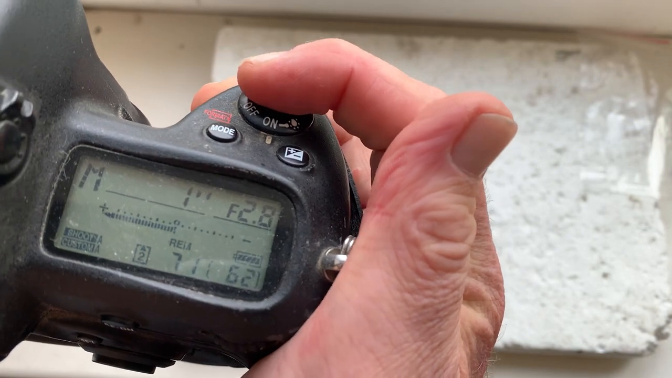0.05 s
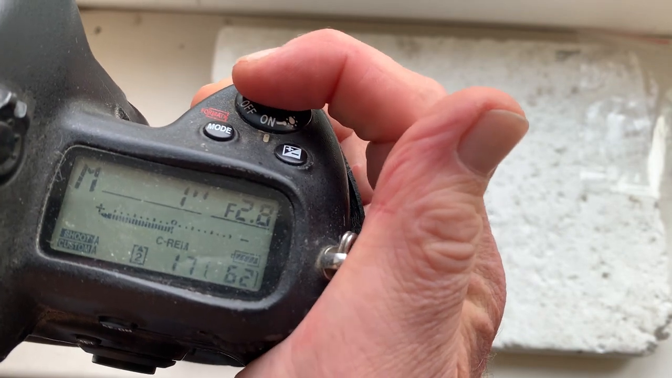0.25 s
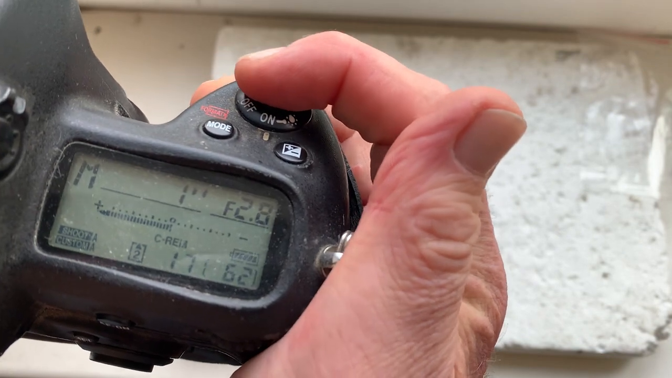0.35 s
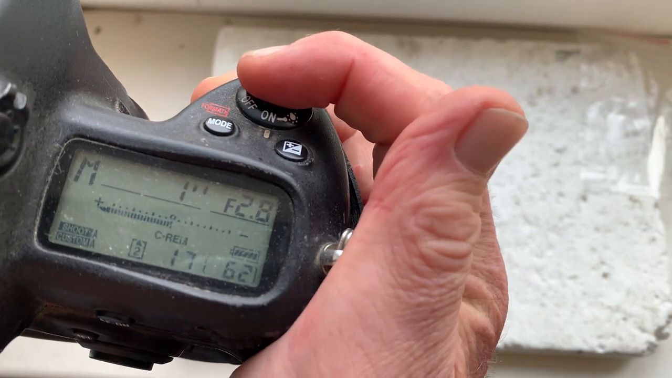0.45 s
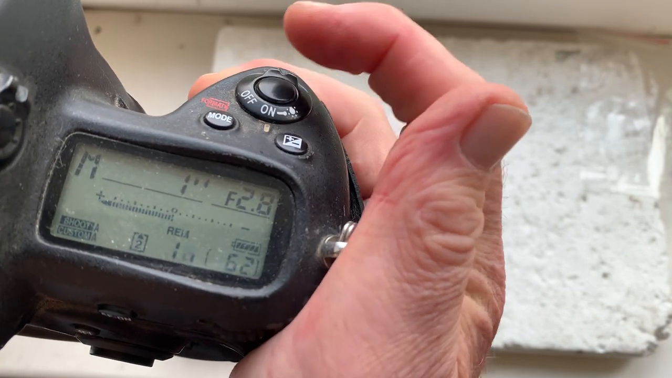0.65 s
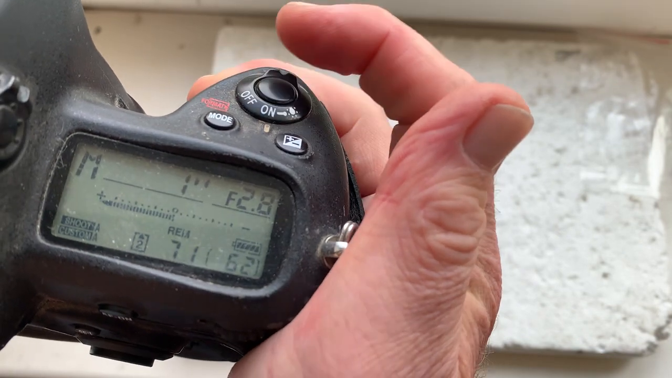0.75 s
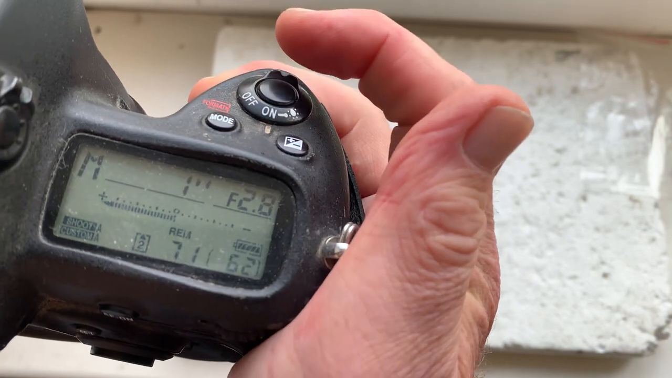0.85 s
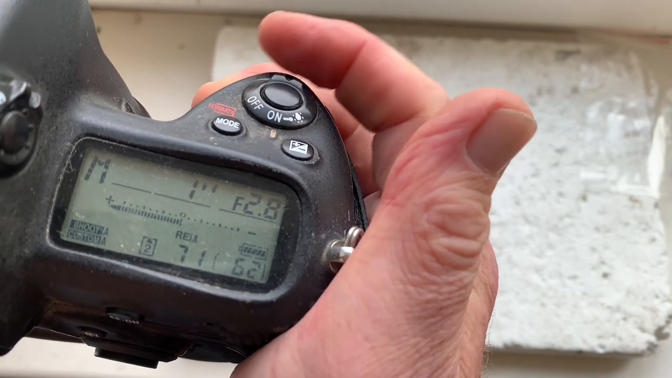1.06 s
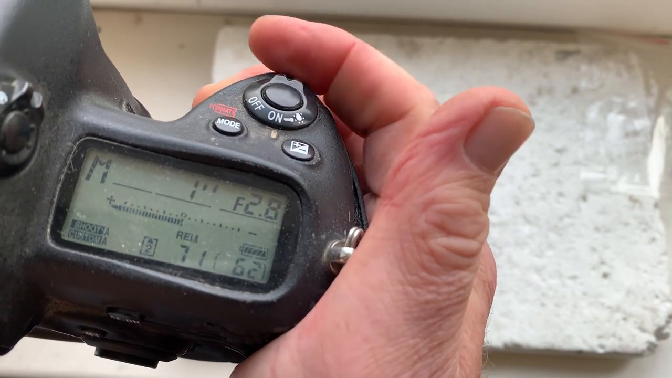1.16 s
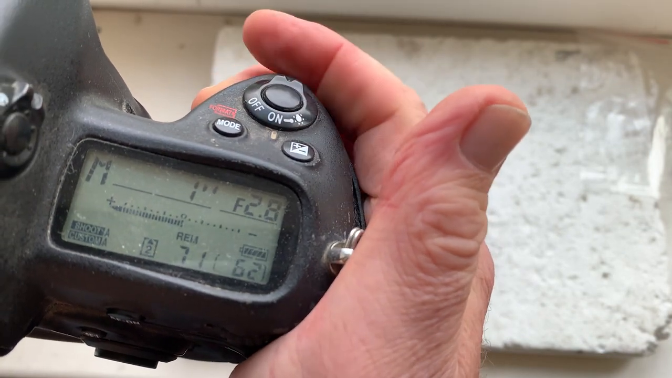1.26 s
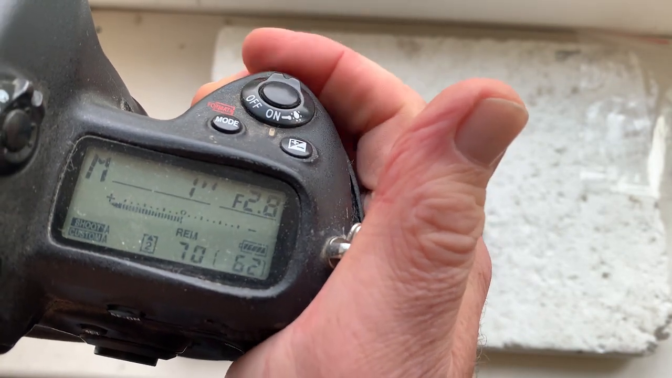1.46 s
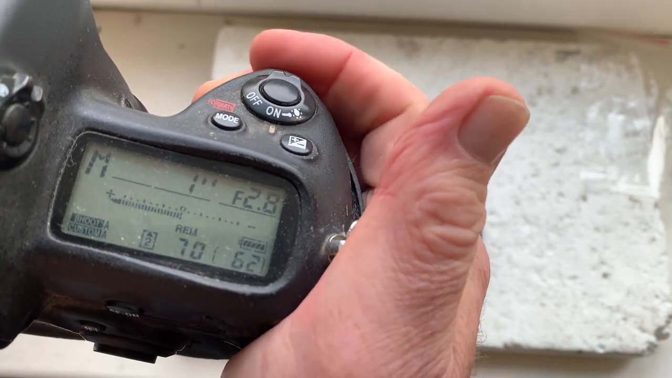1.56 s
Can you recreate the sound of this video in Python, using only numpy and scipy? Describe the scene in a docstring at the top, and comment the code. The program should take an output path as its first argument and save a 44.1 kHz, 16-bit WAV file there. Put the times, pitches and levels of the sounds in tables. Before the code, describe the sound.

A reflex camera shutter, close up in a small, quiet room. At 0.24 s the mirror slaps up sharply, followed by the curtain click at 0.28 s. A faint button-release tick comes near 0.58 s. At 1.27 s the second curtain snaps shut and the mirror drops, rattling in a rapid cluster until about 1.33 s. Short bright room tail; barely audible grip ticks, wavering low hum and rumble.

```python
"""A reflex camera's mechanism takes a one-second exposure, close to two microphone ports in a small room.
The mirror slaps up and the first curtain runs; the finger lets the button go; then the second curtain
closes and the mirror drops and rattles to rest. Each contact is a coloured noise burst plus body modes;
a decaying-noise room answers. Beneath lie a wavering sine hum, filtered-noise rumble and hiss, and
a very faint gliding whistle near the close."""
import sys
import numpy as np
from scipy import signal
from scipy.fft import rfft, irfft, next_fast_len
from scipy.io import wavfile
from scipy.ndimage import map_coordinates

SR = 44100
rng = np.random.default_rng(int(sys.argv[2]) if len(sys.argv) > 2 else 0)


def materialize(psi):
    """Save the field psi as 16-bit PCM at rate SR to the path in sys.argv[1].

    A 1-D psi becomes a single channel; in a 2-D psi each row is a channel.
    """
    bounded = np.clip(np.atleast_2d(psi).T, -1, 1)
    quanta = np.round(bounded * 32767).astype(np.int16)
    wavfile.write(sys.argv[1], SR, quanta)


N = 70560  # samples, 1.6 s

# Contacts of the mechanism. Each row: start in seconds, part name, level in dB,
# brightness in dB per octave above 500 Hz, nominal t60 in seconds.
CONTACTS = [ (.2351, "mirror up", -8, .5, .011), (.2367, "mirror up", -9, 0, .016),
            (.2400, "mirror up", -26.5, -1, 0.15), (0.2498, "mirror up", -26, 3.5, 0.013),
            (0.2487, "mirror up", -26, 4, .018), (.2560, "mirror up", -32, 1, 0.017),
            (.2640, "first curtain", -38, -7, 0.048), (0.2713, "first curtain", -29, -2.5, 0.05),
            (.2757, "first curtain", -15, 0, .02), (.2775, "first curtain", -17, 1, .025),
            (1.2694, "second curtain", -26.5, 2, 0.068), (1.271, "second curtain", -23, 1, 0.055),
            (1.2755, "second curtain", -10.5, .5, .021), (1.2818, "second curtain", -24, 1.5, 0.082),
            (1.2885, "mirror down", -28.5, -2.5, 0.047), (1.2932, "mirror down", -11, .3, .016),
            (1.2973, "mirror down", -14, -1.5, 0.02), (1.3004, "mirror down", -18.5, 3, .026),
            (1.3023, "mirror down", -21.5, -0.5, 0.025), (1.307, "mirror down", -24, -2, 0.07),
            (1.3102, "mirror down", -20.5, -1.3, .018), (1.3144, "mirror down", -20, -1.5, 0.011),
            (1.3179, "mirror down", -12, 1, .018), (1.3224, "mirror down", -26.5, -2, 0.042),
            (1.3263, "mirror down", -34, -2, .03), (0.0381, "grip", -62, 1, .015),
            (0.1347, "grip", -65.5, -1.5, 0.021), (0.555, "button", -64, 16.5, 0.071),
            (0.568, "grip", -56.5, 3.5, .025), (.5768, "button", -40, -2, 0.018),
            (0.5782, "grip", -58, 0.5, .04), (1.4853, "grip", -69.5, 2, 0.018)]
# Moving parts by name. Each entry: relative colour as rows of Hz and dB, body ring in dB, room send in dB.
PARTS = {"mirror up": ([(120, -33.5), (195, -32), (1140, -9.5), (1350, -5), (1800, -18), (2140, -9),
         (2660, -10.5), (3560, -3), (6650, -16), (9130, -3.5), (9570, -17), (10600, 3), (11900, -10.5),
         (13300, -5), (14100, -18.5), (14600, -18), (15600, -25)], -8, 0), "first curtain": ([(120, -44),
         (209, -47), (329, -33), (835, -31), (1020, -7), (1450, -1.5), (1700, -13), (2270, -22),
         (4160, -5.5), (7380, -12.5), (8570, -3), (10500, -2.5), (11600, -7), (13200, -6.5), (14600, -18.5),
         (15600, -17.5)], -2, 2.4), "second curtain": ([(120, -32), (167, -42), (391, -3.5), (588, -16.5),
         (1350, 9.5), (2390, -12), (3240, 2), (5630, -4), (7640, 3), (8710, -7.5), (8990, -2.5),
         (11800, -7.5), (12600, 4.5), (13700, -15.5), (14400, -30), (15600, -19)], 0, 0),
         "mirror down": ([(120, -25.5), (240, -26.5), (349, -19.5), (509, -30.5), (802, -9), (1400, -5),
         (2460, -15.5), (3400, -7.5), (7380, -11), (8160, 1.5), (11000, -3), (11400, -13), (12300, -0.5),
         (13200, -5), (14300, -16), (15600, -22.5)], -3.4, -1.4), "button": ([(500, -32), (1440, -43),
         (4630, -15), (5510, -10.5), (7330, -11), (8830, 4.5), (10400, -4), (12500, -8), (15600, -44)],
         -35, 2), "grip": ([(300, -16), (1600, -6.5), (2500, -11), (2850, 3.5), (3250, -13.5), (4200, -7),
         (5500, -16), (11000, -11.5), (15000, -30)], -14, -2)}
# Springs and frame, rung by every contact. Each row: frequency in Hz, level in dB, t60 in seconds.
BODY_MODES = [(381.6, -20.5, 0.057), (453.3, -24.5, 0.04), (882, -23, 0.035), (1427, -31.5, .13),
              (1687, -23, 0.091), (1878, -23.5, .1), (3755, -26, .06), (3990, -25.5, .08),
              (4380, -23.5, 0.049), (6281, -22.5, .08), (7020, -25, 0.064), (9780, -26.5, 0.075),
              (10700, -25, .08), (12020, -27.5, 0.061)]
# Phase lead of the left port over the right. Each row: frequency in Hz, lead in radians.
LEFT_LEAD = [(380, 0.5), (560, 0.2), (1000, 2), (1400, 4), (2200, 4), (3000, 8), (3700, 7), (4400, 10.5),
             (5300, 7.5), (6400, 7), (8600, 2.5), (10900, 0.5), (13300, -3.5), (15700, -8.5)]
# Left-right likeness of the direct sound. Each row: frequency in Hz, correlation from 0 to 1.
DIRECT_LIKENESS = [(300, 0.94), (1400, .85), (2500, 0.41), (5500, 0.36), (8000, .95), (13000, 0.97),
                   (15000, 1)]
# Left-right likeness of room and background. Each row: frequency in Hz, correlation from 0 to 1.
ROOM_LIKENESS = [(100, 1), (400, 0.85), (1000, 0.3), (6000, 0.21), (8500, 1), (13000, 1)]
# Decay of the room. Each row: frequency in Hz, t60 in seconds.
ROOM_T60 = [(300, 0.12), (1400, 0.29), (5000, 0.2), (10000, 0.18), (15000, 0.069)]
# Colour of the room. Each row: frequency in Hz, gain in dB.
ROOM_COLOUR = [(200, 2.5), (600, 0.5), (1400, -5.5), (3000, -1.5), (6500, -2), (10000, -5), (15000, -2.5)]
# Faint whistle. Each row: time in seconds, frequency in Hz, peak level in dB.
WHISTLE = [(1.059, 6200, -105), (1.10, 6330, -83), (1.14, 6770, -89), (1.17, 7130, -81.5),
           (1.22, 7200, -90), (1.269, 7000, -64), (1.29, 7000, -120)]
# Shared level of hum and rumble, before their offsets. Each row: time in seconds, level in dB.
HUM_LEVEL = [(0.0, -58), (0.022, -59), (0.084, -62), (0.628, -74), (0.69, -61), (0.716, -66.5), (0.77, -60),
             (0.912, -65), (0.948, -61), (1.122, -64.5), (1.148, -57.5), (1.304, -60.5), (1.336, -70),
             (1.478, -79), (1.514, -76), (1.6, -72.5)]
# Relative colour of the rumble. Each row: frequency in Hz, level in dB.
RUMBLE_COLOUR = [(20, -9.5), (42, 2.5), (58, -1), (76, -0.5), (120, -5.5), (180, -10.5), (280, -29),
                 (390, -19.5), (560, -30), (900, -37), (2000, -51.5)]
# Relative colour of the hiss. Each row: frequency in Hz, level in dB.
HISS_COLOUR = [(100, -2.5), (260, 6), (390, 15), (560, 4), (800, 2.5), (1500, 4.5), (2300, -0.5),
               (7300, -5), (8600, -10.5), (11300, 0), (13000, -4), (14400, -16.5), (16000, -29)]

ATTACK_S, RING_WIDTH_HZ = 0.00046, 17
ROOM_DB, ROOM_BUILD_S = -18, 0.0038
WHISTLE_WIDTH_HZ = 60
HUM_HZ, HUM_DRIFT_HZ, HUM_DB, HUM_WAVER_DB = 76.5, 3, -1, 1.5
RUMBLE_DB, HISS_DB = -3, -80
HISS_DB_PER_HUM_DB = 0.12
TOP_HZ = 16300  # band limit


def mechanism(size=8192):
    """Every contact cracks and rings the body; returns direct sound and sound sent into the room."""
    direct, outward = np.zeros((2, 2, N + size))
    t_s = np.arange(size) / SR
    hz = np.fft.rfftfreq(size, 1 / SR)
    octaves = np.log2(np.maximum(hz, 500))
    for start_s, part, level_db, bright_db, t60_s in CONTACTS:
        spectrum, ring_db, room_db = PARTS[part]
        colour = amp(interp_log_hz(spectrum, hz) + bright_db * octaves)
        colour = colour / np.sqrt(np.mean(colour ** 2 * (hz < TOP_HZ)))
        struck = crack(t_s, t60_s, colour)
        rung = ring(t_s, lambda f: np.interp(f, hz, colour))
        blow = amp(level_db) * (struck + amp(ring_db) * rung)
        start = round(start_s * SR)
        direct[:, start:start + size] += blow
        outward[:, start:start + size] += amp(room_db) * blow
    return direct[:, :N], outward[:, :N]


def crack(t_s, t60_s, colour):
    """A pair of dense, fast-dying noise bursts in the colour of the struck part."""
    shape = amp(-60 * t_s / t60_s) * attack(t_s)
    spectrum = rfft(rng.standard_normal((2, len(t_s))) * shape)
    # flat magnitude, random phase; then shaped again
    burst = irfft(spectrum / np.abs(spectrum)) * np.sqrt(shape)
    burst *= np.linalg.norm(shape) / np.linalg.norm(burst, axis=1, keepdims=True)
    return irfft(rfft(burst) * minimum_phase(colour))


def ring(t_s, drive, scatter_db=2.0):
    """Body modes, each driven by the blow's strength at its pitch, slightly blurred by loose parts."""
    hz, db, t60_s = np.transpose(BODY_MODES)[:, :, None]
    per_mode = (2, len(hz), 1)
    size = drive(hz) * amp(db + scatter_db * rng.standard_normal(per_mode))
    phase = 2 * np.pi * rng.random(per_mode) + phase_stray(RING_WIDTH_HZ, (len(hz), len(t_s)))
    modes = size * amp(-60 * t_s / t60_s) * np.sin(2 * np.pi * hz * t_s + phase)
    return modes.sum(axis=1) * attack(t_s)


def attack(t_s):
    """Exponential rise of a blow."""
    return 1 - np.exp(-t_s / ATTACK_S)


def room(x):
    """The room's short tail: noise building up, then decaying at a rate set by frequency."""
    hz, t_s, noise = signal.stft(rng.standard_normal((2, SR // 2)), SR, nperseg=256)
    decay = amp(-60 * t_s / interp_log_hz(ROOM_T60, hz)[:, None])
    build = 1 - np.exp(-t_s / ROOM_BUILD_S)
    tail = signal.istft(noise * decay * build, SR, nperseg=256)[1]
    wet = signal.fftconvolve(x, tail / np.linalg.norm(tail[0]), axes=1)[:, :N]
    return amp(ROOM_DB) * filtered(wet, lambda f: amp(interp_log_hz(ROOM_COLOUR, f)))


def ports(pair, likeness):
    """Mixes two signals into left and right, partly alike and shifted in phase by frequency."""
    def mid_side_gains(hz):
        angle = np.arccos(np.clip(interp_log_hz(likeness, hz), 0, 1)) / 2
        return np.array([np.cos(angle), np.sin(angle)])

    def phase_shift(hz):
        return np.exp(.5j * np.outer([1, -1], interp_log_hz(LEFT_LEAD, hz)))

    mid, side = filtered(pair, mid_side_gains)
    return filtered(np.array([mid + side, mid - side]), phase_shift)


def whistle():
    """A very faint sine, widened by phase stray, glides up just before the shutter closes."""
    knot_s, hz, db = np.transpose(WHISTLE)
    t_s = np.arange(N) / SR
    phase = 2 * np.pi * np.cumsum(np.interp(t_s, knot_s, hz)) / SR + phase_stray(WHISTLE_WIDTH_HZ, N)
    present = (t_s > knot_s[0]) * (t_s < knot_s[-1])
    return amp(np.interp(t_s, knot_s, db)) * present * np.sin(phase)


def background():
    """A low hum wavering in pitch and level, with noise rumble; the hiss follows its level slightly."""
    level_db = np.interp(np.arange(N) / SR, *np.transpose(HUM_LEVEL))
    waver = amp(HUM_DB + HUM_WAVER_DB * wobble(12))
    hum_hz = HUM_HZ + HUM_DRIFT_HZ * wobble(9)
    hum = waver * np.sin(2 * np.pi * np.cumsum(hum_hz) / SR)
    rumble = amp(level_db + RUMBLE_DB) * coloured_noise(RUMBLE_COLOUR)
    hiss_db = HISS_DB + HISS_DB_PER_HUM_DB * (level_db - level_db.mean())
    hiss = amp(hiss_db) * coloured_noise(HISS_COLOUR)
    return amp(level_db) * hum + ports(rumble + hiss, ROOM_LIKENESS)


def coloured_noise(colour):
    """A pair of noises in this colour, at unit RMS."""
    return unit(filtered(rng.standard_normal((2, N)), lambda hz: amp(interp_log_hz(colour, hz))))


def wobble(knots_per_s):
    """A smooth random curve through normal knots."""
    knots = rng.standard_normal(int(N * knots_per_s / SR) + 4)
    return map_coordinates(knots, [np.arange(N) * knots_per_s / SR])


def phase_stray(width_hz, shape):
    """A random-walk phase that widens a tone."""
    return np.cumsum(rng.standard_normal(shape), axis=-1) * np.sqrt(2 * np.pi * abs(width_hz) / SR)


def amp(db):
    """dB to amplitude."""
    return 10 ** (np.asarray(db) / 20)


def unit(x):
    """Scales to unit RMS."""
    return x / np.sqrt(np.mean(x ** 2) + 1e-20)


def interp_log_hz(points, hz):
    """Interpolates rows of Hz and value on a log-frequency axis."""
    f, v = np.transpose(points)
    return np.interp(np.log(hz + 1), np.log(f + 1), v)


def filtered(x, response):
    """Applies a frequency response to x, with zero padding."""
    m = next_fast_len(N + SR // 2)
    return irfft(rfft(x, m) * response(np.fft.rfftfreq(m, 1 / SR)), m)[..., :N]


def minimum_phase(gain):
    """The response with this gain that rings only after its cause, by folding the cepstrum."""
    cepstrum = irfft(np.log(np.maximum(gain, 1e-6)))
    half = len(cepstrum) // 2
    folded = np.r_[cepstrum[0], 2 * cepstrum[1:half], cepstrum[half], np.zeros(half - 1)]
    return np.exp(rfft(folded))


def scene():
    """The camera close by, the room around it, whistle and background."""
    direct, outward = mechanism()
    camera = ports(direct, DIRECT_LIKENESS)
    reverb = ports(room(outward), ROOM_LIKENESS)
    return camera + reverb + whistle() + background()


def record(dry):
    """The recorder's band limit: a very steep low-pass."""
    return filtered(dry, lambda hz: 1 / np.sqrt(1 + (hz / TOP_HZ) ** 200))


dry = scene()
out = record(dry)
materialize(out)
```